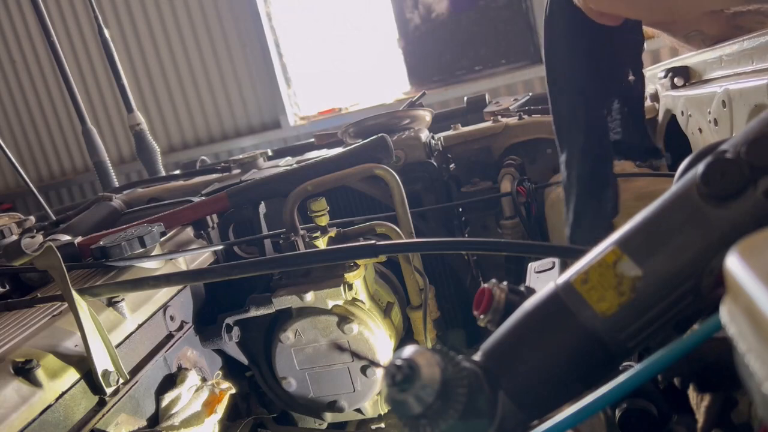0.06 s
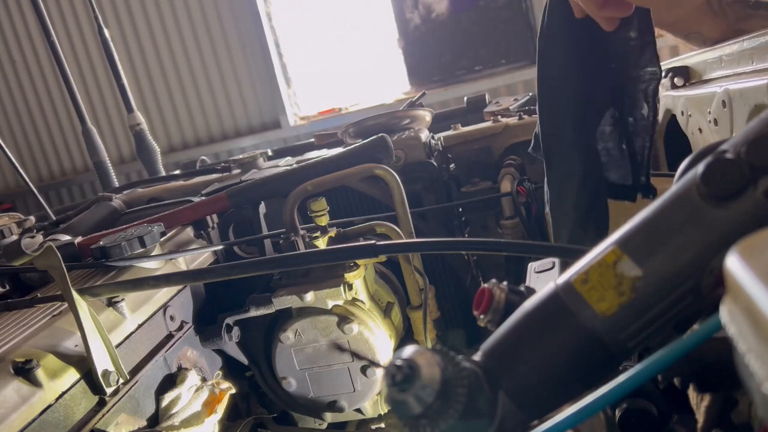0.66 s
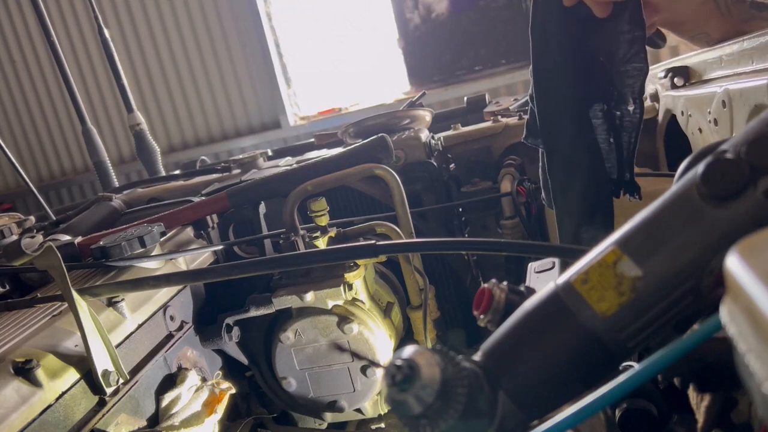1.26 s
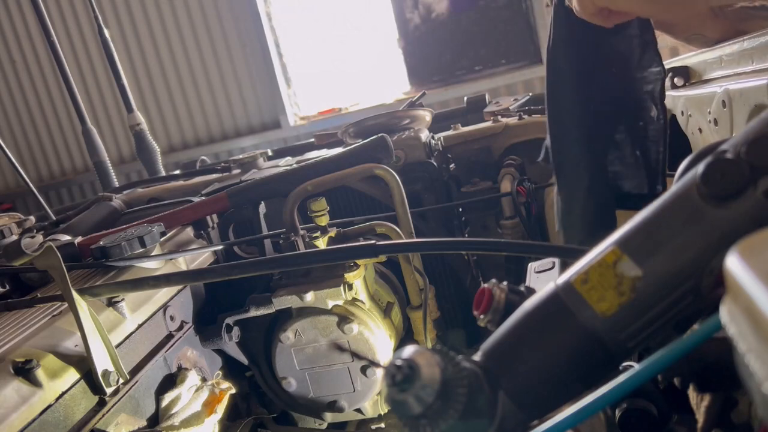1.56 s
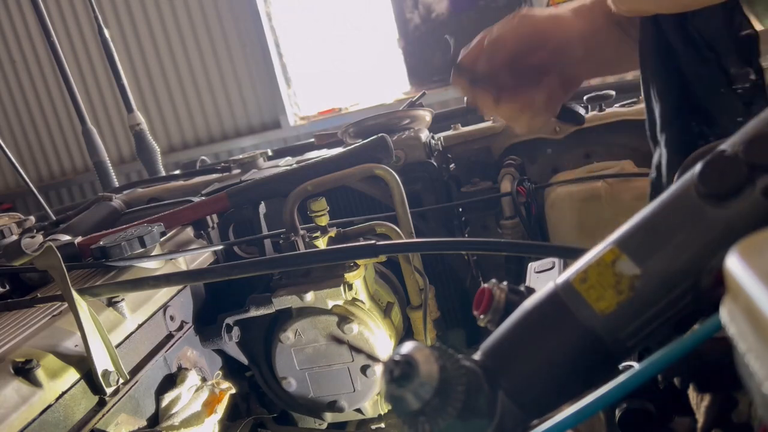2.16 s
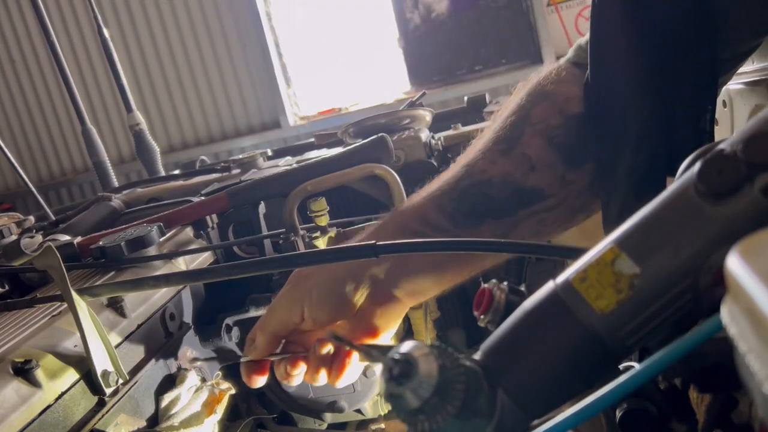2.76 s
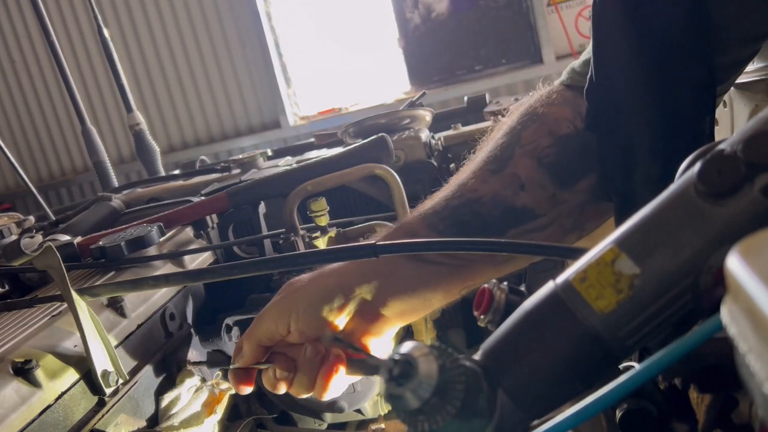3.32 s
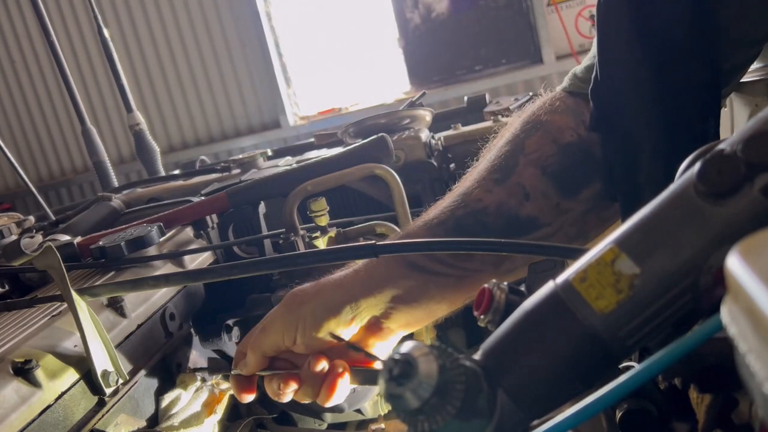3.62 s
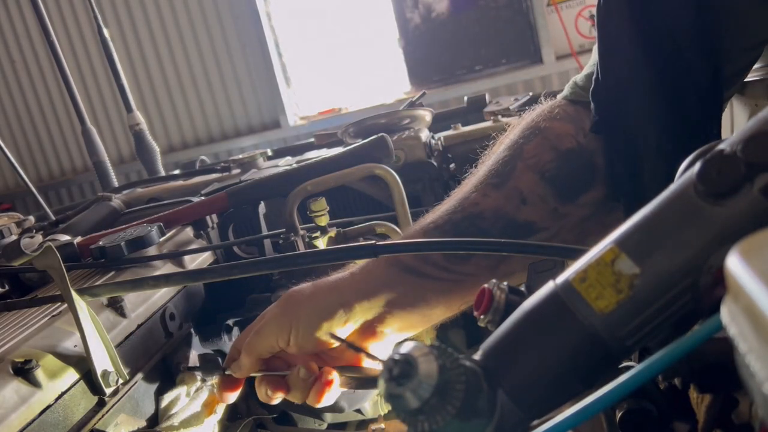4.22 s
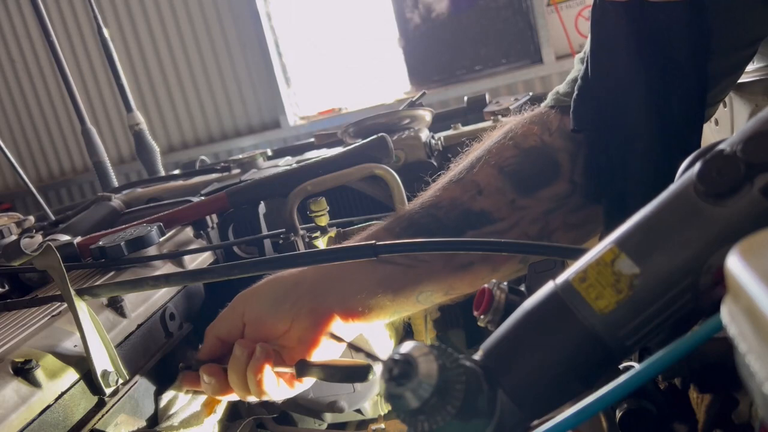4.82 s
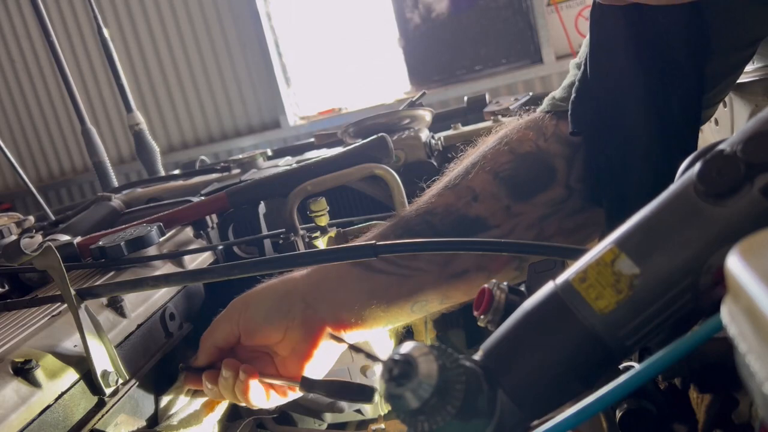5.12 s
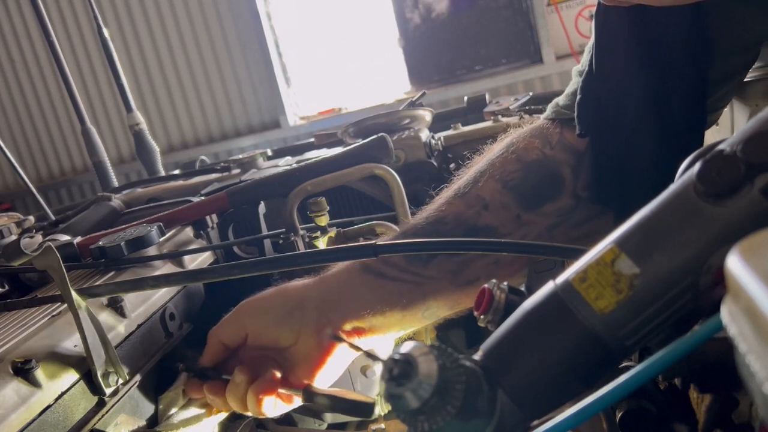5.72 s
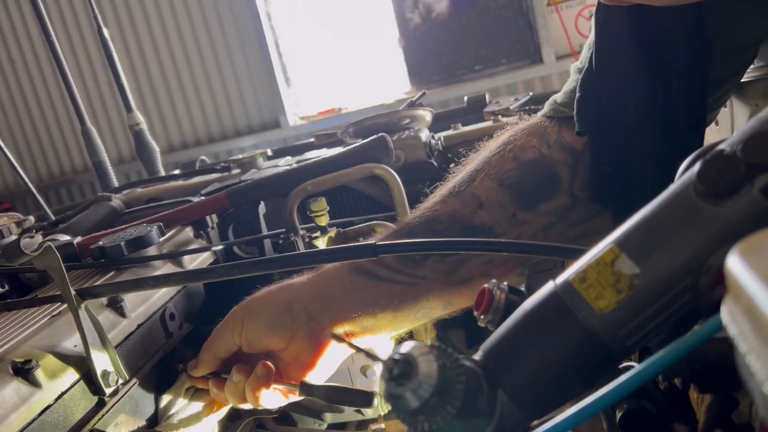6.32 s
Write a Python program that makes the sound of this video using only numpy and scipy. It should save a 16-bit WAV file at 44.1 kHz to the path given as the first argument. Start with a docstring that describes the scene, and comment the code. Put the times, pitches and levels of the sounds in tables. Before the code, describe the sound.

A piston air compressor runs across a workshop, giving a fast, even chug over motor hum, low rumble and light valve clatter. A soft air hiss builds slightly, and thin whistles briefly rise out of it. Close to the microphone, a hand tool scrapes faintly twice in an engine bay, then ticks and catches with a dry steel click near the end as the compressor carries on.

```python
"""A belt-driven piston air compressor chugs across a tin-walled workshop. From the start, each crank
turn sends a thump and a trailing ring of tank and pump head over motor hum, frame rumble, valve clatter
and air hiss. The hiss builds a little, and from 1.4 s thin whistles rise out of it. At 2.1 s a hand tool
scrapes faintly close by; the mechanic then leans over an engine bay, shifting the room's standing waves.
The tool scrapes again at 4.1 s, and at 5.3 s it ticks and catches with a dry steel click."""
import sys
import numpy as np
from scipy import signal
from scipy.fft import rfft, irfft
from scipy.io import wavfile

SR = 44100
rng = np.random.default_rng(int(sys.argv[2]) if len(sys.argv) > 2 else 0)


def transcribe(signal):
    """Save signal, clipped to [-1, 1], as a 16-bit WAV file at the path in sys.argv[1]."""
    frames = np.atleast_2d(signal).T
    limited = np.clip(frames, -1, 1)
    pcm = np.round(limited * 32767).astype(np.int16)
    wavfile.write(sys.argv[1], SR, pcm)


N = 285768
T, HZ = np.arange(N) / SR, np.fft.rfftfreq(N, 1 / SR)

CRANK_HZ, DIFFUSE_HZ, HIGH_CUT_HZ = 20.715, 640, 15900
HISS_START_DB, HISS_HOLD_DB, HISS_BUILD_S = -3.5, -2, 1.6
LEAN_START_S, LEAN_TAKES_S = 2.3, 0.75

# main crank harmonics, as the standing waves leave them: multiple, left level/dB, right level/dB
MAIN_HARMONICS = [(3, -50, -50), (5, -46.5, -51.5), (7, -47, -46.5), (8, -37.5, -40.5), (9, -55, -59),
                  (10, -74, -89), (11, -44.5, -51.5), (12, -56, -64), (14, -47, -54), (15, -40.5, -43),
                  (16, -45, -64), (17, -59, -50.5), (19, -57.5, -55.5), (21, -58.5, -60), (23, -55, -63),
                  (24, -54.5, -66), (30, -52, -61.5), (32, -69, -57.5), (35, -69, -70), (39, -58, -53),
                  (41, -59, -49.5), (42, -63, -52), (43, -54, -52.5), (44, -54.5, -55), (47, -63, -54.5),
                  (48, -71, -88), (49, -59.5, -52), (52, -65, -59), (56, -63.5, -74), (63, -56.5, -66),
                  (65, -52.5, -58.5), (67, -58.5, -61.5), (78, -58.5, -62)]
# close tones that make a harmonic throb: multiple, offset f/Hz, swell t/s, level/dB re the harmonic
BEATS = [(43, 1.09, .55, -6), (44, 1.08, .87, -1), (49, -1.13, .78, -7)]
# thump first, the ring of tank and pump head trailing: f/Hz, delay/crank turns
RING_DELAY = [(280, .81), (340, 2.33), (420, 2.2), (560, 2.7), (720, 1.7), (830, 1.75), (950, 2.4),
              (1100, 2.9), (1260, 3.1), (1460, 5.6), (1700, 7), (2200, 9)]
# the other harmonics, rung out of pump head and tank: f/Hz, level/dB per harmonic
SHELL = [(85, -54), (185, -57), (215, -74), (270, -79), (350, -48), (380, -63.5), (470, -68.5), (580, -74),
         (660, -59.5), (760, -84), (815, -59.5), (890, -56), (1060, -70), (1170, -60), (1245, -79),
         (1320, -64), (1650, -66.5), (1850, -71.5), (2200, -89)]
# pan of those harmonics: f/Hz, left minus right level/dB
SHELL_PAN = [(200, 0.5), (450, 2), (590, -4), (670, -11), (725, 5), (840, -9.5), (920, 5.5), (1020, 0),
             (1200, 4), (1330, 10), (1450, 1.5), (1700, 0.5)]
# stereo width of the pump: f/Hz, phase between the sides/rad
PUMP_WIDTH = [(60, 0), (330, .25), (450, .9), (540, 2), (620, 1.1), (680, 1.5), (760, 2.6), (830, 2.3),
              (900, 1.5), (1160, 1.4), (1330, 1.9), (1500, 2.4)]
# motor and belt tones, out of step with the crank: f/Hz, level/dB
MOTOR_TONES = [(44.4, -60), (48.8, -60), (86.9, -64), (96.5, -64), (99.9, -58), (110.8, -64), (154.6, -65),
               (162.1, -65), (172.9, -61.5), (174.1, -61.5), (179.4, -57), (182.8, -61.5), (193.6, -63),
               (213.6, -63), (214.4, -63), (405.7, -64), (426.3, -60.5), (628.7, -67), (790.4, -65),
               (810.9, -65), (852.6, -66), (896.2, -67)]
# noise colours of frame, valves and air, ahead of pan and swells: f/Hz, level/dB per Hz
RUMBLE = [(15, -99), (30, -90), (42, -66), (60, -65), (130, -69), (190, -69.5), (250, -80), (330, -77.5),
          (410, -73.5), (490, -76), (900, -100), (3000, -140)]
CLATTER = [(60, -110), (250, -100), (500, -83), (640, -72.5), (740, -84.5), (840, -76), (1000, -78.5),
           (1220, -82.5), (1420, -84.5), (1700, -83), (1950, -99), (8000, -130)]
HISS = [(100, -125), (800, -92), (2100, -89.5), (3000, -89.5), (4000, -89), (5500, -93.5), (7400, -91),
        (8400, -89), (9300, -96), (10300, -99.5), (11800, -103), (14000, -105), (15800, -112)]
# how alike the noise is left and right: f/Hz, coherence/0..1
NOISE_COHERENCE = [(100, .97), (270, .9), (450, .55), (740, .2), (2000, .35), (3300, .5), (5500, .5),
                   (8500, .75), (14000, .8)]
# phase of the noise both sides share: f/Hz, left lead/rad
NOISE_LEAD = [(60, 0), (2500, .3), (7400, 1.0), (8600, 0), (10100, -3.1), (11900, -6.3), (13700, -9.4),
              (15300, -12.6)]
# pan of the noise: f/Hz, left minus right level/dB
NOISE_PAN = [(60, 2.5), (270, 6), (450, -3.5), (740, -1), (860, 2.5), (1220, 4), (1400, 5), (1700, 0.5),
             (2000, 4), (3300, 1.5), (5500, 8), (9000, 0.5), (15000, -0.5)]
# narrow resonances in the hiss: f/Hz, width/Hz, level/dB re the hiss
HISS_RINGS = [(2077, 140, 6), (2440, 210, 4), (3554, 70, -0.5), (4040, 130, -2), (4405, 44, 4),
              (6680, 200, -3), (8080, 110, -1)]
# whistles and broader sizzles: fade-in t/s, fade-out t/s, f/Hz, width/Hz, level/dB re the hiss
WHISTLES = [(1.36, 1.73, 4070, 300, 4), (2.12, 2.17, 4110, 120, 8), (2.35, 3.08, 4030, 75, 7),
            (1.48, 2.0, 8090, 70, 4.5), (1.4, 1.95, 8350, 400, -5), (2.18, 2.34, 8090, 85, 8),
            (2.17, 2.34, 8300, 400, -1)]
# touches of the hand tool: peak t/s, level/dB, rise/s, decay/s, tilt/dB per octave
TOUCHES = [(2.09, -59.5, .03, .04, -4), (4.107, -47.5, .005, .009, -5), (4.123, -46, .003, 0.015, -6.5),
           (5.322, -51.5, .002, .003, 5), (5.329, -44.5, 0.0076, 0.0075, -5), (5.3345, -43, .0015, .004, 4),
           (5.352, -46, 0.012, 0.009, -3.5), (5.3595, -49, .0006, .0015, 4), (5.3672, -41, .0004, .0012, 5),
           (5.3682, -35.5, .0004, .0016, -2), (5.372, -44.5, .001, .005, -1)]
# colour of steel scraping steel: f/Hz, relative level/dB
STEEL_COLOUR = [(300, -40), (1500, -5), (3500, -5.5), (6000, 1.5), (9000, 1), (12000, -3.5), (15500, -6),
                (18000, -18)]
# shift of the standing waves as the mechanic leans in: f/Hz, level change/dB over the whole lean
LEAN_SHIFT = [(160, 0.9), (320, -1.3), (450, -2), (620, 0.6), (800, 0), (880, 1.5), (1000, 0.5),
              (1200, 0.5), (1350, 2.5), (1700, 0.5)]


def gain_of(db):
    """Decibels to amplitude."""
    return 10 ** (np.asarray(db) / 20)


def unit_rms(x):
    """Scales to rms 1."""
    return x / np.sqrt(np.mean(x ** 2) + 1e-20)


def curve(points, hz):
    """Reads a table as straight lines on a log-frequency axis."""
    f, value = np.transpose(points)
    return np.interp(np.log(hz + 1), np.log(f + 1), value)


def ramp(start_s, length_s):
    """Rises evenly from 0 to 1, then holds."""
    return np.clip((T - start_s) / length_s, 0, 1)


def drift(rate_hz):
    """Random modulation of about rms 1, with little above the given rate."""
    t = np.linspace(0, T[-1], 1024)
    f = np.fft.rfftfreq(len(t), t[1])
    spectrum = rfft(rng.standard_normal(len(t))) * (f > 0) / (1 + (f / rate_hz) ** 2)
    return np.interp(T, t, unit_rms(irfft(spectrum)))


def noise(density_db):
    """Coloured stereo noise, partly shared by the two sides and panned by frequency."""
    left, separate = rfft(rng.standard_normal((2, N)))
    alike = np.clip(curve(NOISE_COHERENCE, HZ), 0, 1)
    right = alike * np.exp(-1j * curve(NOISE_LEAD, HZ)) * left + np.sqrt(1 - alike ** 2) * separate
    pan = gain_of(np.outer([.5, -.5], curve(NOISE_PAN, HZ)))
    return irfft(np.array([left, right]) * pan * gain_of(density_db), N) * np.sqrt(SR / 2)


def tone(cycles, left_db, right_db, lead_rad, waver_db):
    """One stereo partial with a wavering level."""
    level = gain_of([[left_db], [right_db]]) * gain_of(waver_db * drift(1.2))
    return np.sqrt(2) * level * np.cos(2 * np.pi * cycles + np.array([[.5], [-.5]]) * lead_rad)


def pump(turns, scatter_db=2, waver_db=.5, scatter_cycles=0.16):
    """Crank harmonics: the lows land together as one chug a turn, the highs later and smeared."""
    main_db = {k: sides for k, *sides in MAIN_HARMONICS}
    beats = {k: beat for k, *beat in BEATS}
    lean = ramp(LEAN_START_S, LEAN_TAKES_S)
    out, lag = np.zeros((2, N)), 0
    for k in range(3, 104):
        hz = k * CRANK_HZ
        left, right, side, shift = rng.uniform(-1, 1, 4)
        diffuse = min(hz / DIFFUSE_HZ, 1) ** 3  # higher harmonics come mostly off the walls
        lead = curve(PUMP_WIDTH, hz) * np.sign(side)
        lag += curve(RING_DELAY, hz - CRANK_HZ / 2)  # delay adds up to phase, harmonic by harmonic
        cycles = k * turns - lag + scatter_cycles * diffuse * shift
        shell_db = curve(SHELL, hz) + curve(SHELL_PAN, hz) * np.array([.5, -.5])
        sides_db = main_db.get(k, shell_db + scatter_db * np.array([left, right]))
        partial = tone(cycles, *sides_db, lead, waver_db + diffuse / 4)
        if k in beats:
            apart_hz, swell_s, db = beats[k]
            partial += gain_of(db) * tone(cycles + apart_hz * (T - swell_s), *sides_db, lead, waver_db)
        out += partial * gain_of(curve(LEAN_SHIFT, hz) * (lean - lean.mean()))
    return out


def motor(waver_db=1.5, pan_db=4.5, wander_cycles=0.028, full_pan_hz=120):
    """Mains hum, shaft and belt tones beat against the pump; they sit left, the deepest near centre."""
    out = np.zeros((2, N))
    for hz, db in MOTOR_TONES:
        side_db = pan_db * min(hz / full_pan_hz, 1) ** 2
        cycles = hz * T + rng.random() + wander_cycles * drift(0.7)
        out += tone(cycles, db + side_db, db - side_db, 0, waver_db)
    return out


def frame_rumble():
    """The shaking frame lays down a steady low bed."""
    return noise(curve(RUMBLE, HZ))


def valves(turns, depth=0.21, decay_strokes=0.35, late_turns=0.044):
    """Intake and outlet valves slap in turn, twice a revolution; the room smears the bursts."""
    stroke = 2 * (turns - late_turns) % 1
    bursts = unit_rms(1 + depth * np.exp(-stroke / decay_strokes))
    return noise(curve(CLATTER, HZ)) * bursts


def hiss_band(hz, width_hz):
    """The hiss through one resonance."""
    return noise(curve(HISS, HZ) - 20 * np.log10(1 + 2 * ((HZ - hz) / width_hz) ** 2))


def air_hiss(flutter_db=0.64, wander_db=1.5):
    """Air hisses with a light flutter while narrow resonances swell and fade in it."""
    out = noise(curve(HISS, HZ)) * gain_of(flutter_db * drift(25))
    for hz, width_hz, db in HISS_RINGS:
        out += hiss_band(hz, width_hz) * gain_of(db + wander_db * drift(0.89))
    return out


def air_whistles(fade_s=0.07, chatter_db=2, chatter_hz=35):
    """Resonances in the air rise briefly to thin, chattering whistles and sizzles."""
    out = np.zeros((2, N))
    for start_s, end_s, hz, width_hz, db in WHISTLES:
        swell = ramp(start_s, fade_s) - ramp(end_s, fade_s)
        out += hiss_band(hz, width_hz) * swell * gain_of(db + chatter_db * drift(chatter_hz))
    return out


def hand_tool():
    """Steel drags on steel with dull scrapes and brighter ticks, then catches with a hard, dry click."""
    out = np.zeros((2, N))
    for peak_s, db, rise_s, decay_s, tilt_db in TOUCHES:
        force = gain_of(db) * np.exp(-np.maximum((peak_s - T) / rise_s, (T - peak_s) / decay_s))
        scrape = noise(curve(STEEL_COLOUR, HZ) + tilt_db * np.log2(HZ + 1))
        out += force * unit_rms(scrape)
    return out


def scene(speed_wobble=0.00042):
    """Mixes compressor, air and tool; the belt lets the crank speed wobble very slightly."""
    turns = np.cumsum(CRANK_HZ * (1 + speed_wobble * drift(4.1))) / SR
    compressor = pump(turns) + motor() + frame_rumble() + valves(turns)
    build_db = HISS_START_DB + (HISS_HOLD_DB - HISS_START_DB) * ramp(0, HISS_BUILD_S)
    air = (air_hiss() + air_whistles()) * gain_of(build_db)
    return compressor + air + hand_tool()


def record(dry):
    """A steep high cut takes the very top off the mix."""
    high_cut = signal.firwin(511, HIGH_CUT_HZ, window=("kaiser", 9), fs=SR)
    return signal.oaconvolve(dry, high_cut[None], "same")


dry = scene()
out = record(dry)
transcribe(out)
```